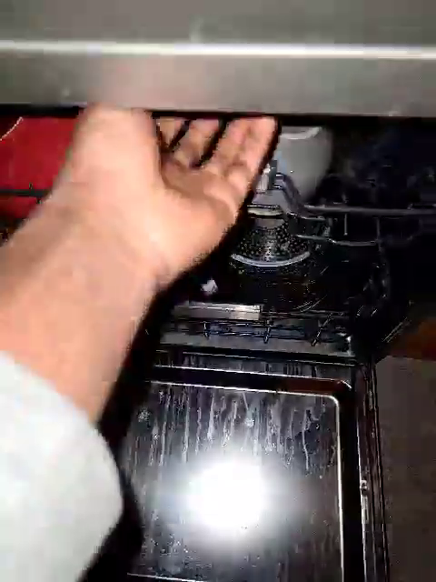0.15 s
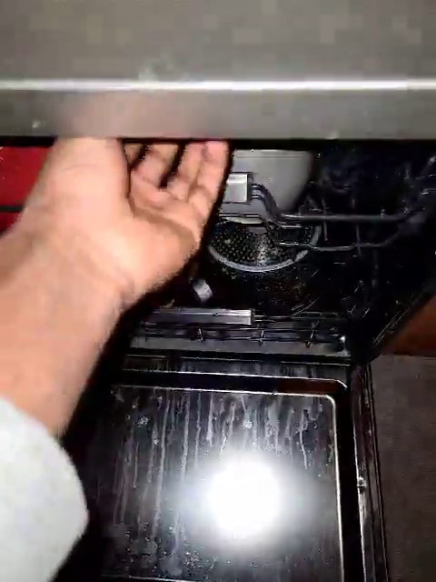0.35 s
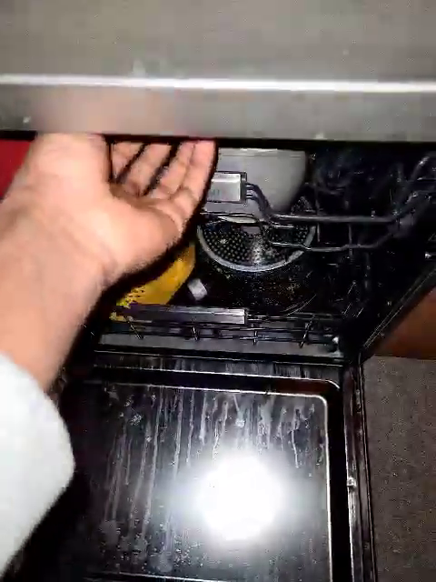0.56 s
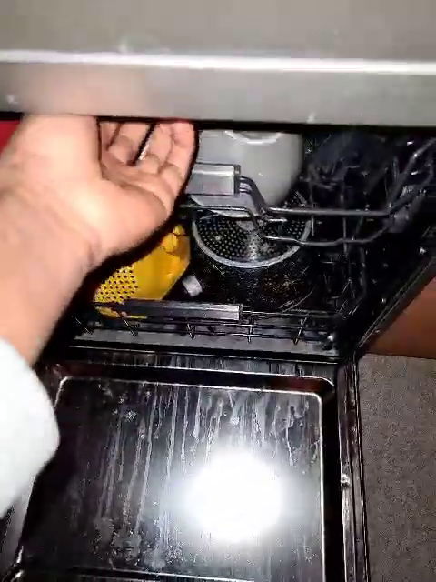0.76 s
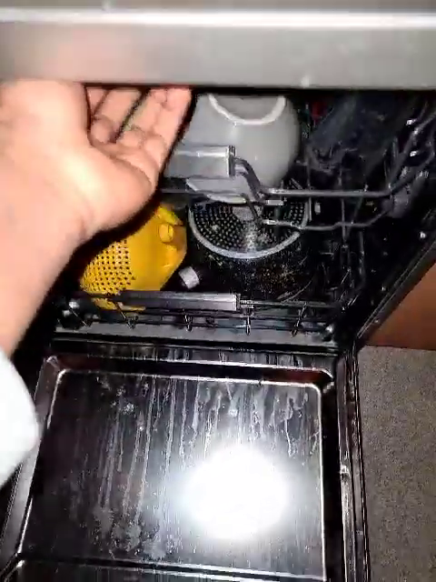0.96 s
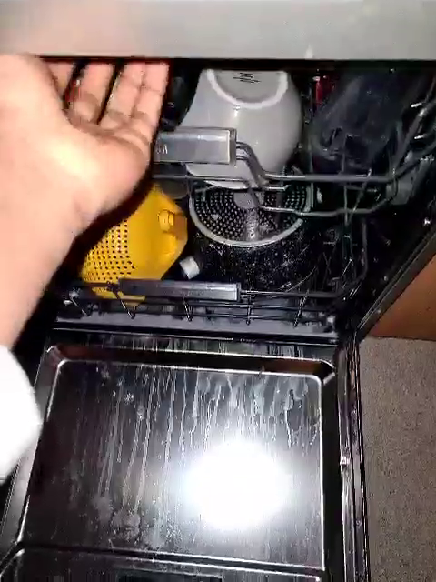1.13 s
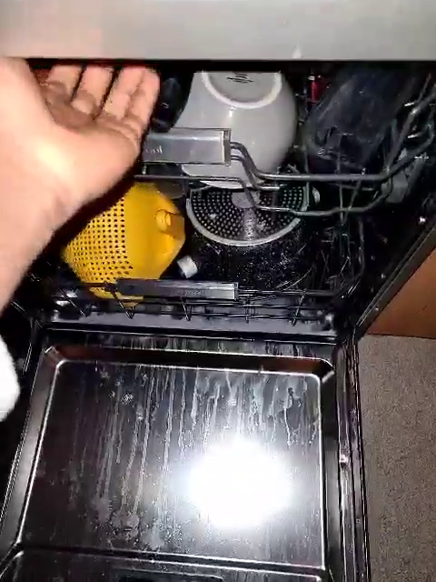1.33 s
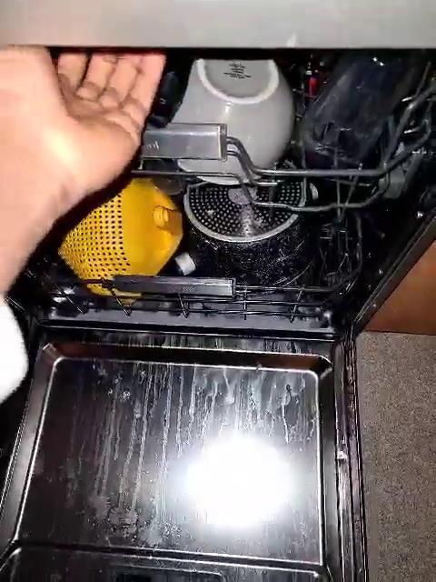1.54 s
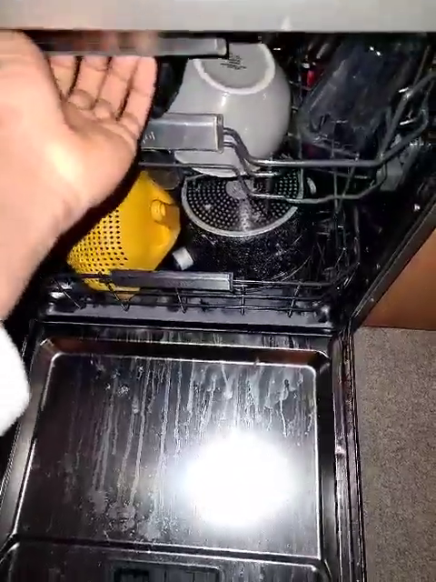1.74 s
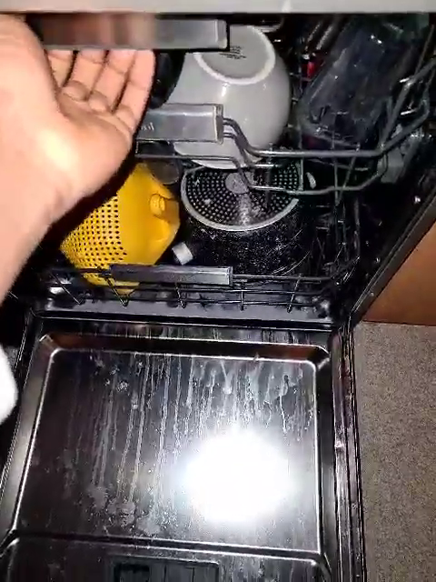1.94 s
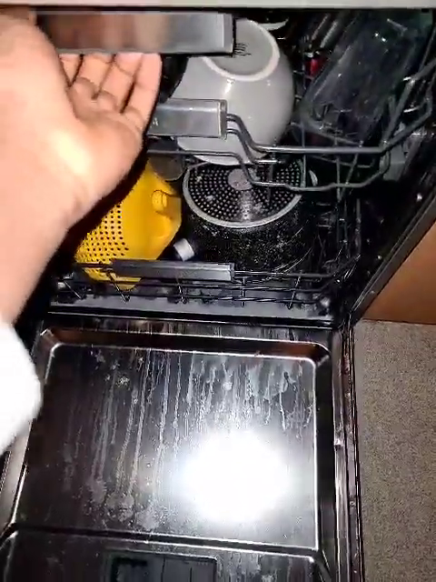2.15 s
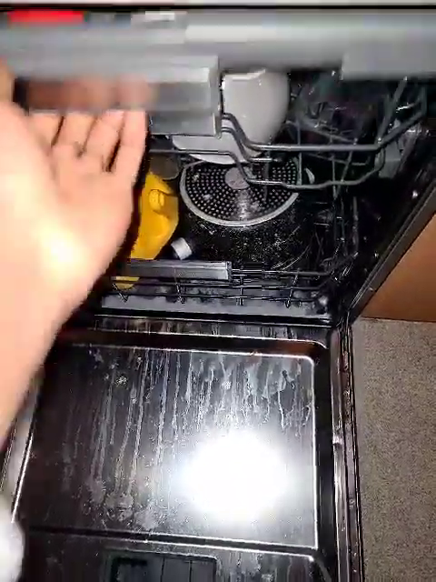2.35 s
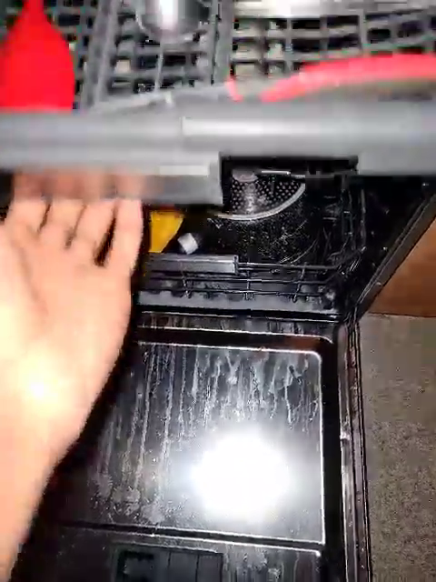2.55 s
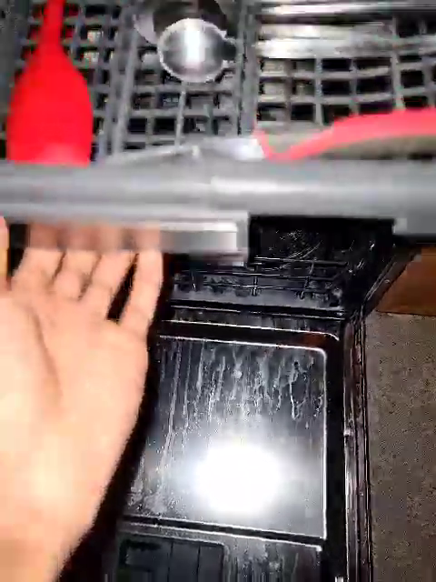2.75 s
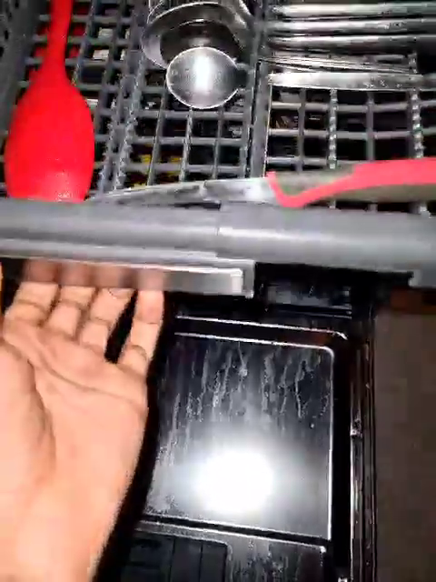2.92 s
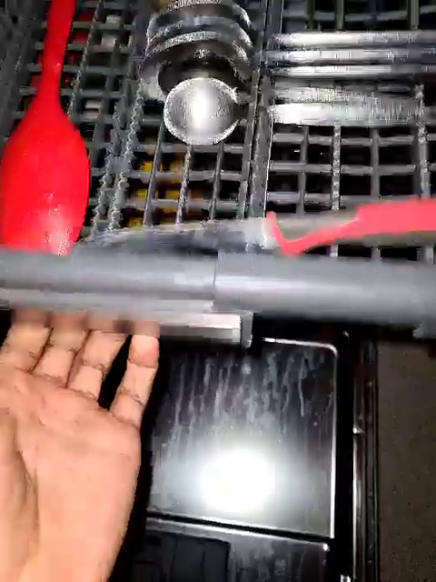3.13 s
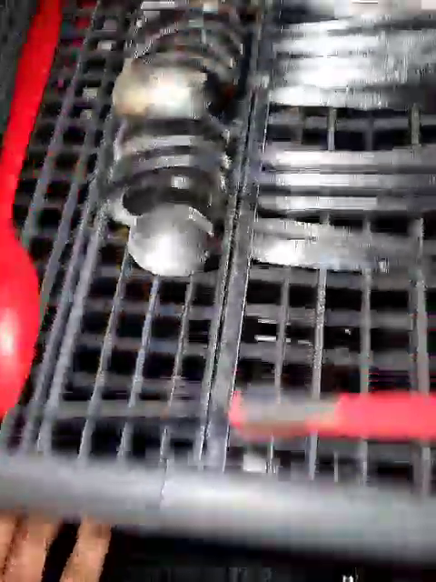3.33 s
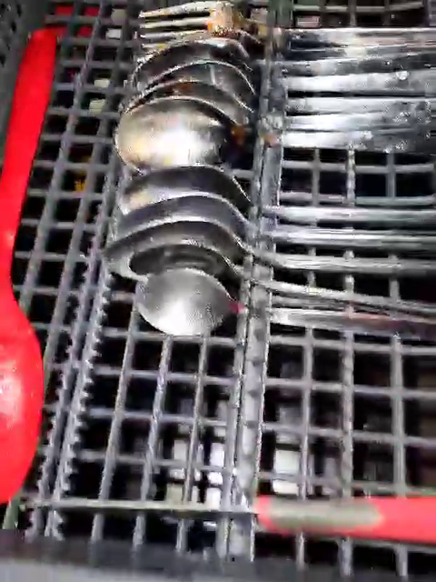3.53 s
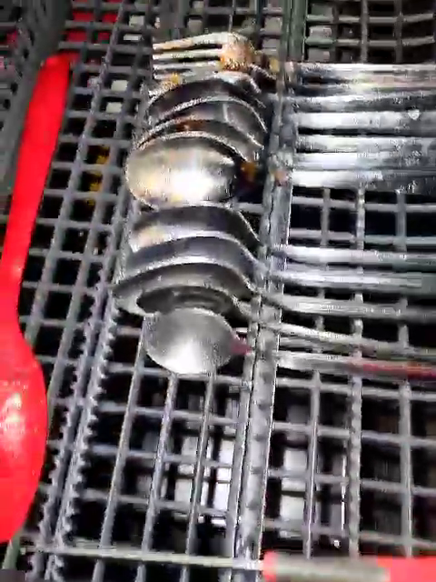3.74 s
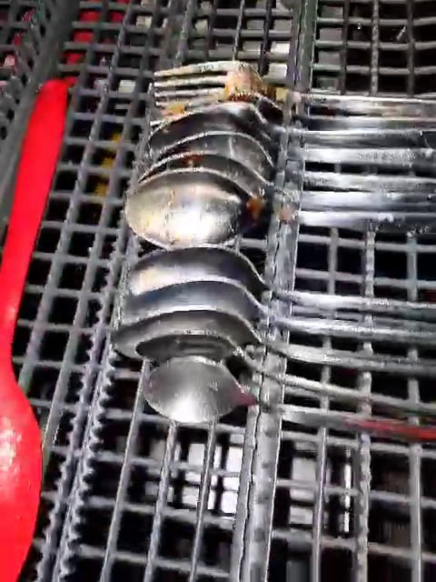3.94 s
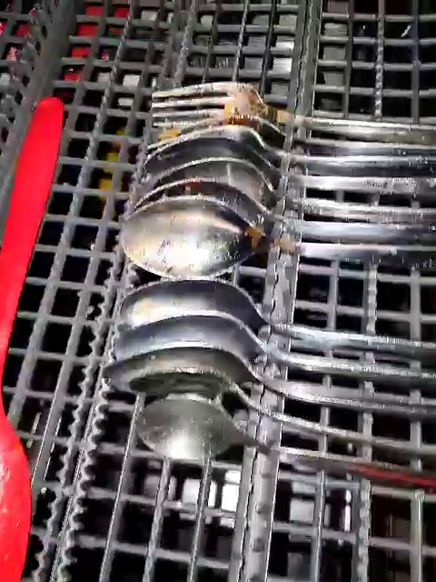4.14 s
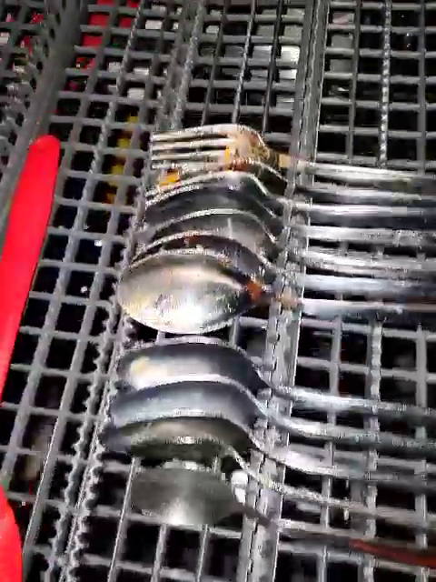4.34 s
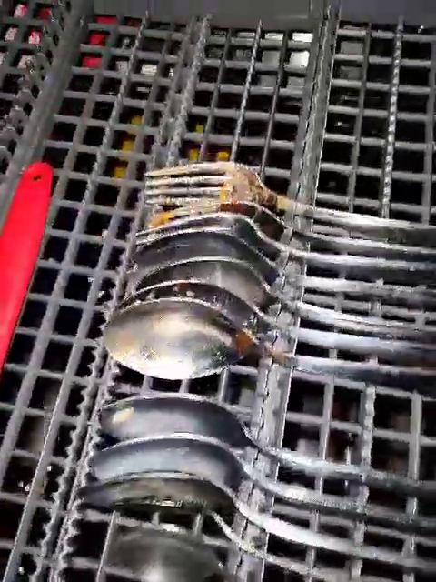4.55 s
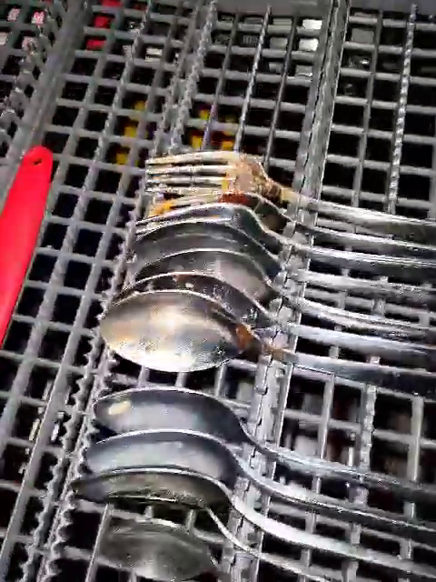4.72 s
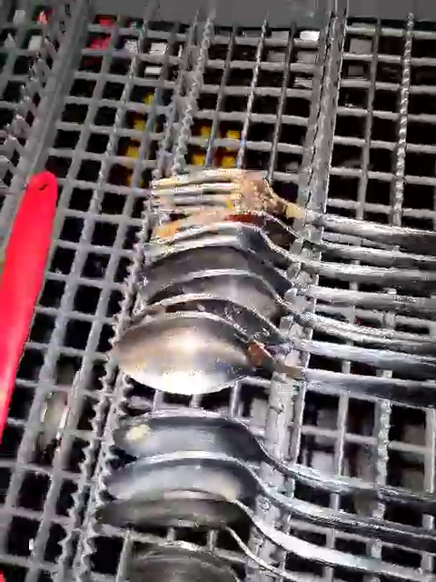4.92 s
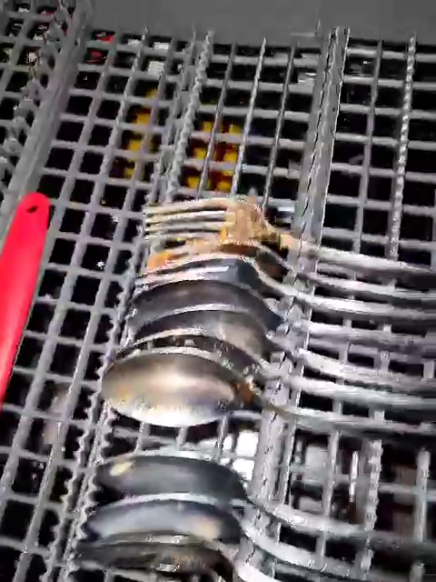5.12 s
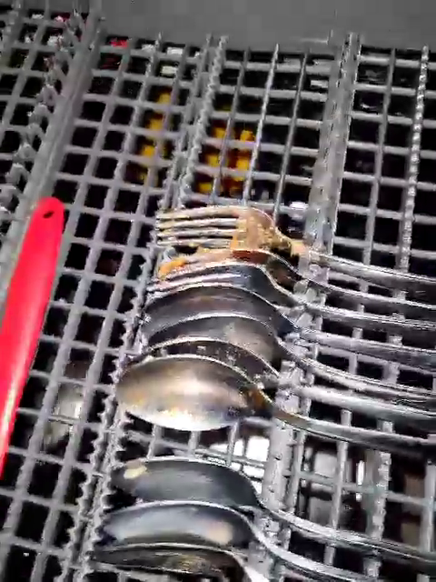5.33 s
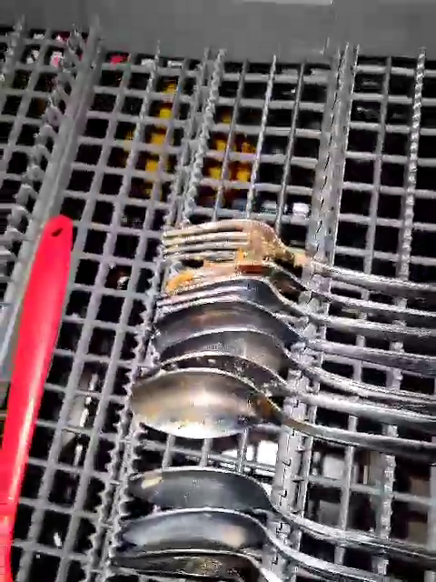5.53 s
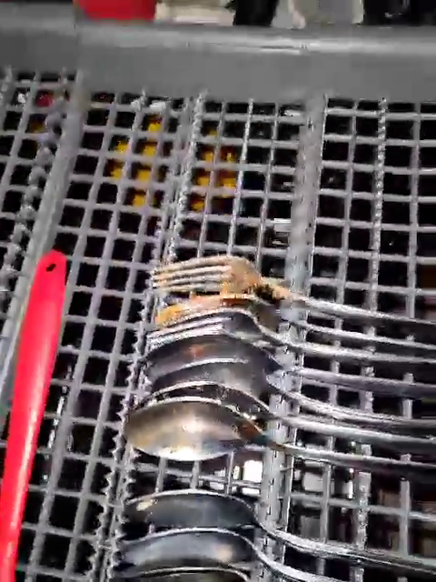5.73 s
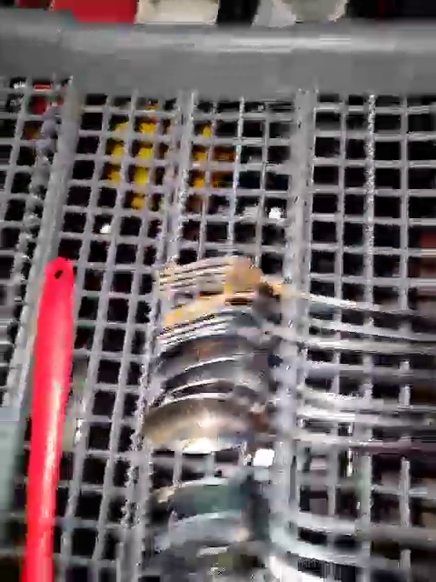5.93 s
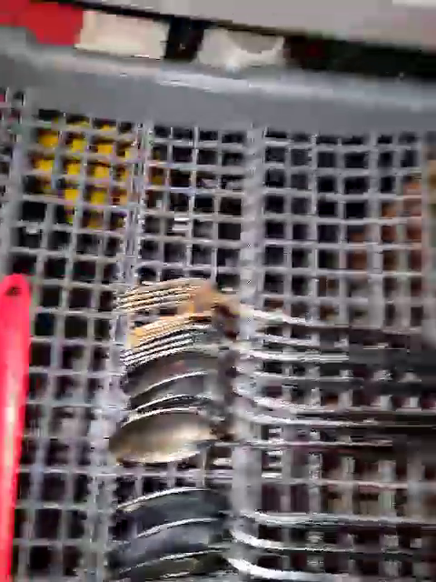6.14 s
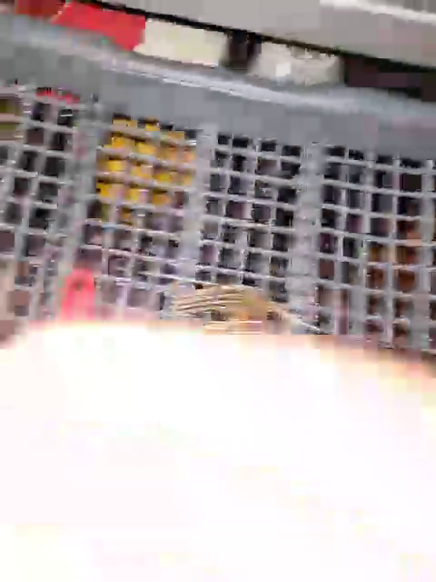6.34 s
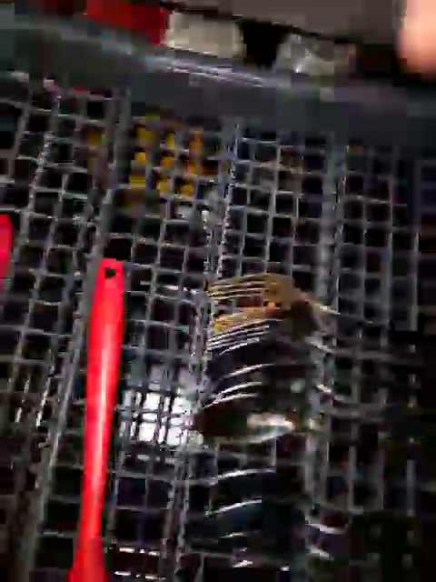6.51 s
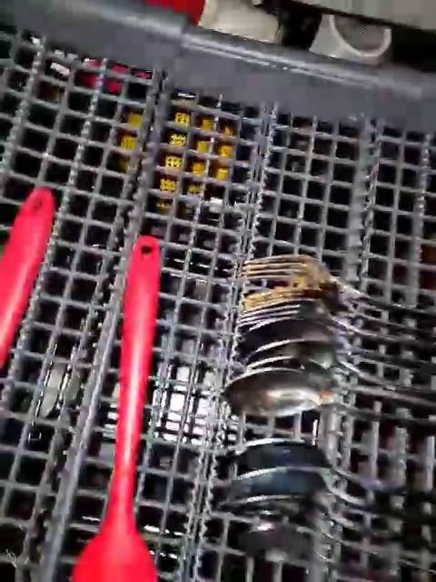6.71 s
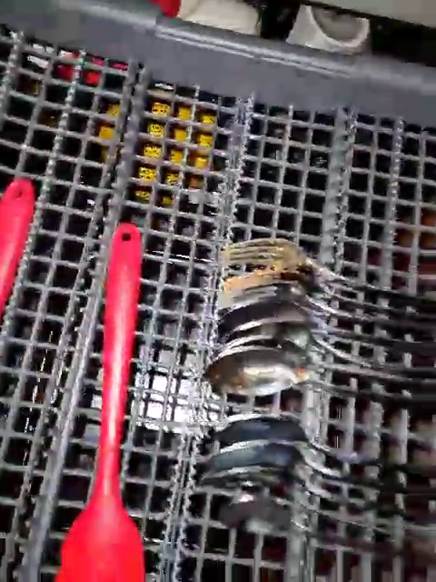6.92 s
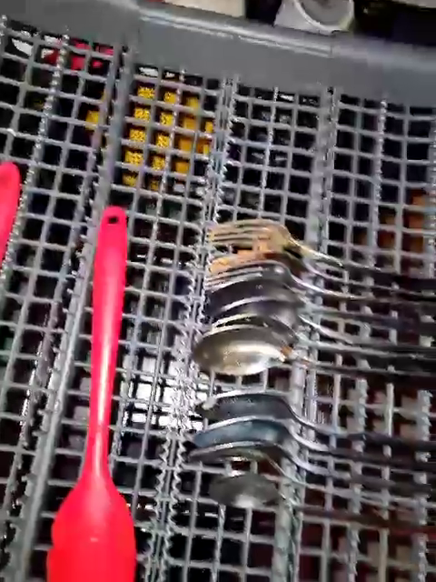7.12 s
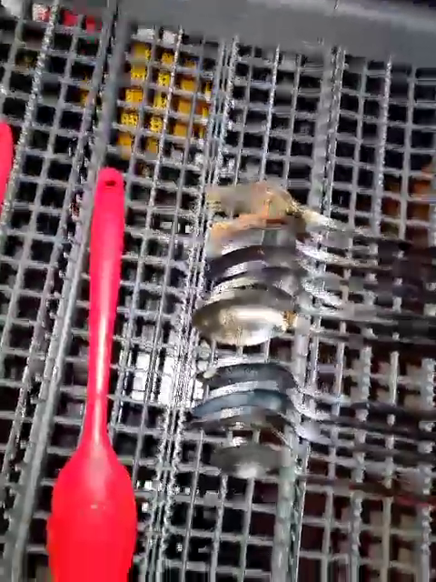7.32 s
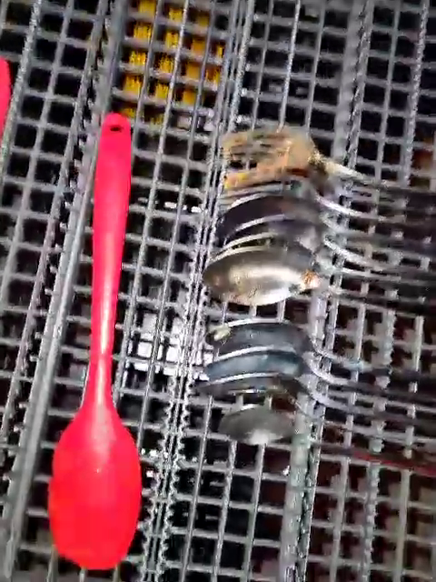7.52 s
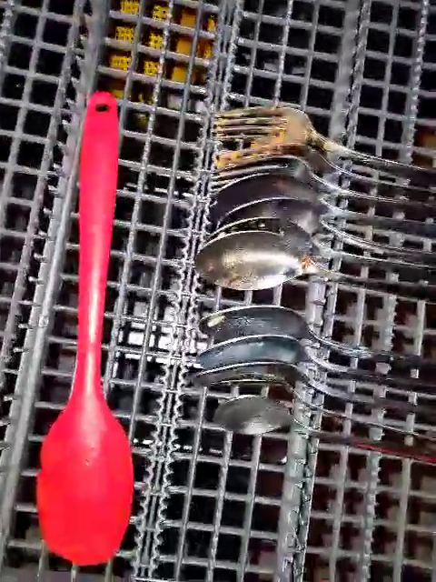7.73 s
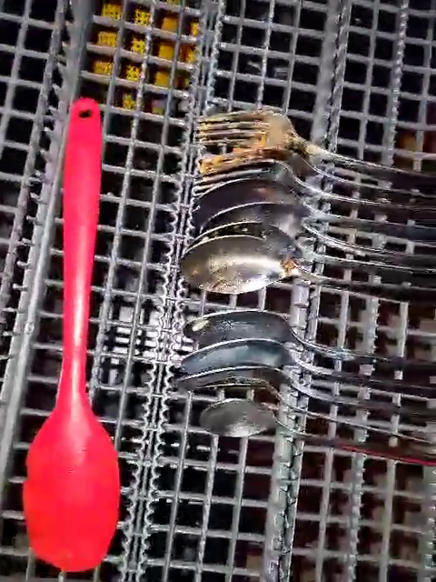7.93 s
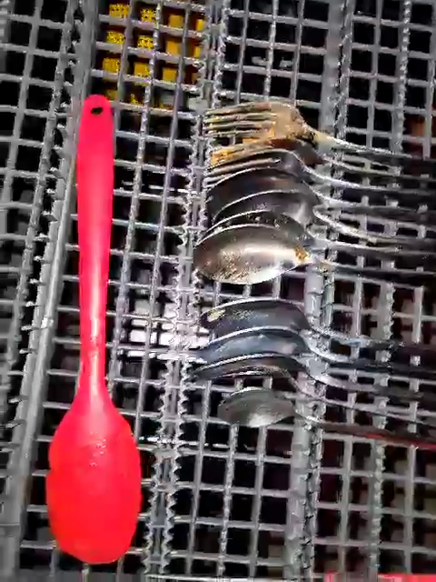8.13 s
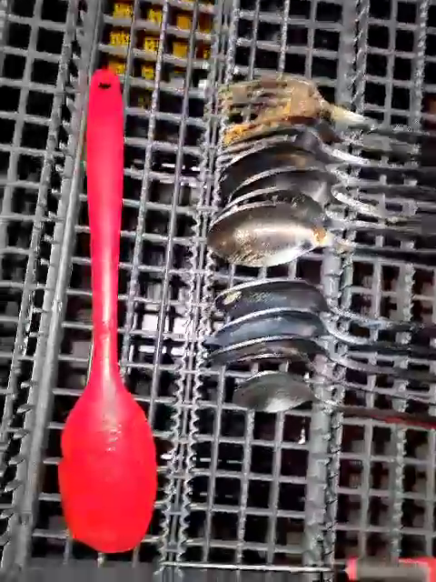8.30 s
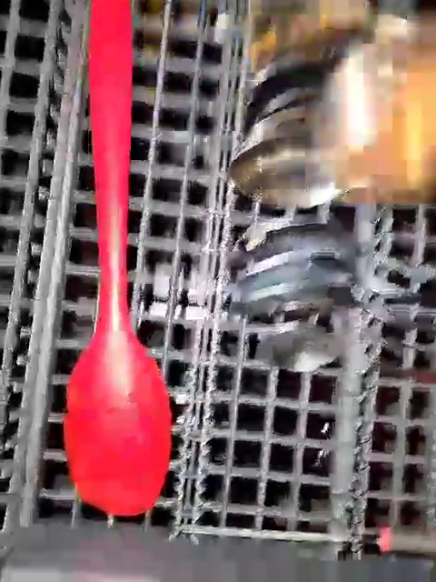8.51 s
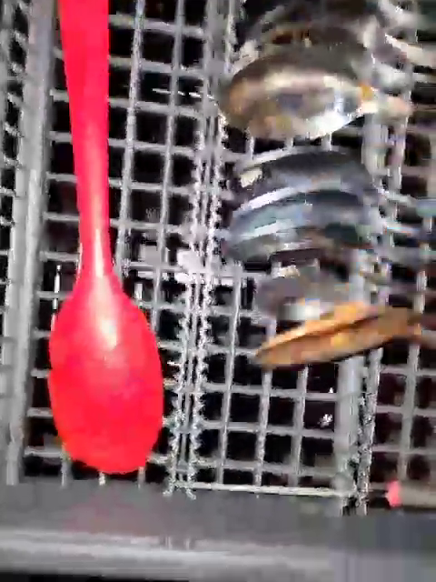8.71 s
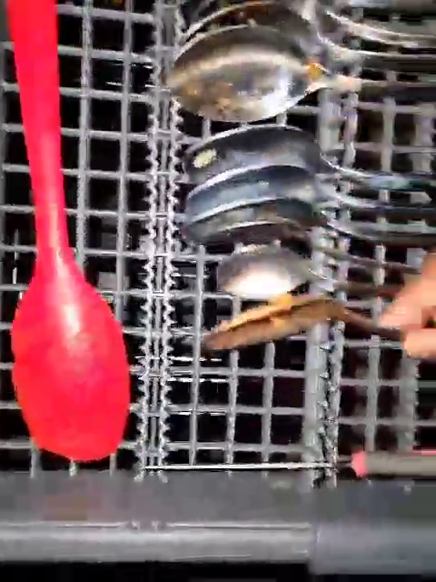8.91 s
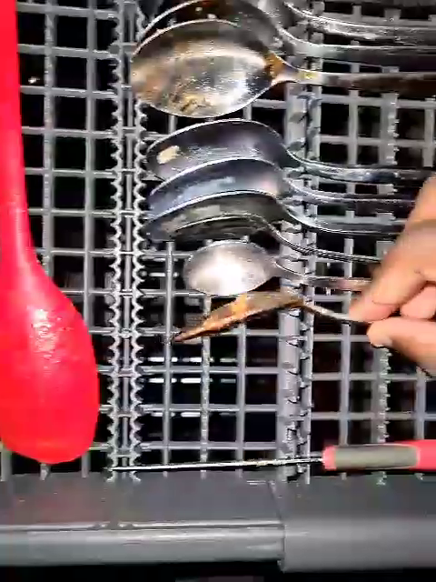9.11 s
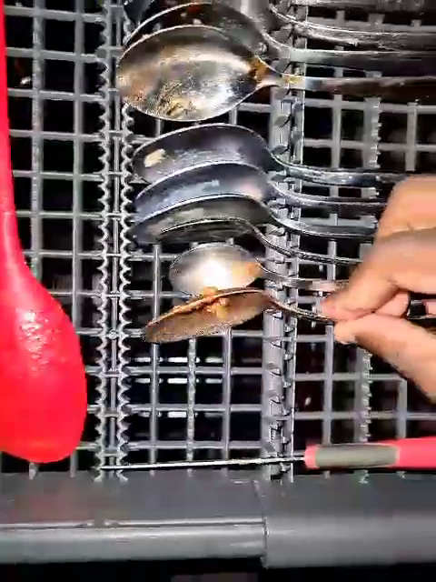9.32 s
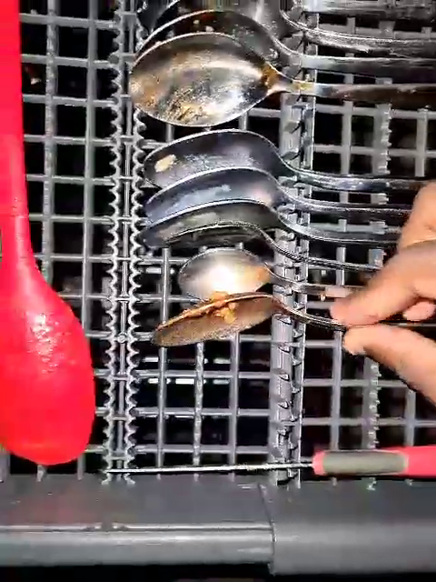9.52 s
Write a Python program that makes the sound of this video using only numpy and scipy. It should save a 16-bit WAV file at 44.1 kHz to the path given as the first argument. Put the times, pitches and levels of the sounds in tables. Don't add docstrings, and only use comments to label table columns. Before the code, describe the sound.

A quiet kitchen with faint low hum and air, heard close with a short, dull room echo. From 0 to 1.4 s a hand makes small clacks, scuffs and soft thuds on the rack, with a slight rising slip near 0.9 s. At about 1.6 s a brighter cluster of plastic and wire knocks; a faint low squeak at 1.8 s and a short higher chirp at 2.15 s. From 2.25 s the tray rolls, rumbling and rattling with jolts at 2.55 and 3.0 s, until a loud crash at 3.3 s, ringing briefly. A smaller knock at 3.5 s, then near silence with light ticks and a soft rub around 4.3-4.7 s. A sharp clattering knock lands at 5.2 s, a scrape at 5.4 s, ticks and scuffs around 6.1 s, bright cutlery clinks 6.6-7.3 s, a tiny spoon buzz at 7.8 s, sparse faint taps, and a crisp tick at 9.2 s.

```python
import sys
import numpy as np
from scipy import signal
from scipy.fft import rfft, irfft, next_fast_len
from scipy.io import wavfile

SR = 44100
rng = np.random.default_rng(int(sys.argv[2]) if len(sys.argv) > 2 else 0)


def inscribe(sig):
    pcm = np.round(np.clip(np.atleast_2d(sig).T, -1, 1) * 32767)
    wavfile.write(sys.argv[1], SR, pcm.astype(np.int16))


def voltage_ratio(level):
    return 10 ** (np.asarray(level, float) / 20)


N = 426006


def rms_one(x):
    return x / np.sqrt(np.mean(x ** 2) + 1e-20)


def in_time(rows):
    s, *columns = np.transpose(rows)
    return [np.interp(np.arange(N) / SR, s, c) for c in columns]


def every_sample(coarse):
    return np.interp(np.arange(N) / 40, np.arange(len(coarse)), coarse)


def drift(rate):
    r = np.exp(-80 * np.pi * rate / SR)
    noise = rng.standard_normal(N // 40 + 2002)
    slow = signal.lfilter([1], [1, -2 * r, r * r], noise)[2000:]
    return every_sample(rms_one(slow))


def band(x, low_hz, high_hz):
    return signal.sosfilt(signal.butter(2, [low_hz, min(high_hz, SR / 2.2)], "band", fs=SR, output="sos"), x)


def resonance(x, hz, width_hz):
    r = np.exp(-np.pi * max(width_hz, 3) / SR)
    poles = [1, -2 * r * np.cos(2 * np.pi * hz / SR), r * r]
    return signal.lfilter([(1 - r * r) / 2, 0, (r * r - 1) / 2], poles, x)


def body(x, modes, lift_db):
    top = max(db for hz, width, db in modes)
    return x + sum(voltage_ratio(db - top + lift_db) * resonance(x, hz, width) for hz, width, db in modes)


def coloured(sources, spectrum, patchy_db):
    hz, level_db = np.transpose(spectrum)
    edges = 22 * 2 ** np.arange(0, 9.6, .5)
    bands = np.zeros((19, N))
    for k, (low, high) in enumerate(zip(edges, edges[1:])):
        if hz[0] < high and low < hz[-1]:
            at = np.interp(np.log(low * high) / 2, np.log(hz), level_db)
            bands[k] = voltage_ratio(at + patchy_db * drift(11)) * band(sources[k % 2], low, high)
    return bands


def grains(size, share, spread_db):
    draw = rng.random((3,) + size)
    sizes = voltage_ratio(spread_db * np.minimum(-np.log(draw[0] + 1e-9), 5))
    return rms_one(sizes * (draw[1] < share) * np.sign(draw[2] - .5))


# frequency in Hz, level in dB per Hz.
AIR_COLOUR = [(15, -37), (25, -8), (63, 12), (129, -0.5), (177, -2), (271, -4.5), (569, -23.5), (1600, -29),
              (11000, -30.5), (12900, -26), (14000, -45.5)]
# frequency in Hz, width in Hz, level in dB.
ROOM_HUM = [(133, 13, -2), (200, 18, -5), (253, 25, -3)]


def kitchen_air():
    air = coloured(rng.standard_normal((2, N)), AIR_COLOUR, patchy_db=2.0).sum(axis=0)
    return voltage_ratio(-68) * rms_one(body(air, ROOM_HUM, lift_db=5.5))


def swells(steady_db, s, peak_db, t60, rise):
    late = np.arange(0, N, 40) / SR - s[:, None]
    events_db = peak_db[:, None] - 60 * np.maximum(late, -late / rise) / np.maximum(t60, .05)[:, None]
    return voltage_ratio(2 * np.vstack([steady_db[::40], events_db]))


# time in seconds, level in dB.
EFFORT_CURVE = [(0, -68), (1.25, -67), (1.43, -83), (1.7, -58.5), (2.04, -73), (2.28, -46.5), (2.9, -47),
                (3.09, -52), (3.3, -34.5), (3.5, -63.5), (3.85, -74), (4.22, -69.5), (4.4, -61.5),
                (4.76, -69), (5.68, -73.5), (7.1, -74.5), (7.64, -87), (9.66, -88.5)]
# peak in seconds, rattle in dB, brightness in dB, settling t60 in seconds.
LOAD_SHAKES = [(0.199, -50, -6.5, 0.64), (0.501, -55.5, -3.5, 0.87), (.85, -57, 1.5, 0.8),
               (1.06, -58, -5, 1.7), (1.6, -45, -11.5, 0.68), (1.76, -53.5, -1, 0.16),
               (2.55, -39, -16.5, 0.3), (2.88, -45.5, -11.5, 1.5), (3.311, -27.5, 5, 0.35),
               (3.531, -47.5, -2, 0.86), (4.978, -63.5, -5.5, 2.6), (5.221, -36.5, -3, 0.33),
               (5.508, -60.5, 10, 0.5), (5.738, -62, 4.5, 1.07), (6.161, -66, 3, 3.4),
               (6.635, -63.5, 12.5, 0.52), (6.873, -51.5, -7, 0.48), (7.307, -73, 17, 0.56),
               (8.32, -78.5, 32.5, 0.56), (9.24, -65, -7.5, 0.68)]
# peak in seconds, panel level in dB, thud level in dB.
RAIL_JOLTS = [(.197, -51.5, -49), (0.351, -49, -54), (.69, -51, -45), (0.759, -46, -46), (.85, -56, -68),
              (1.0, -53.5, -44), (1.27, -56.5, -52), (1.485, -56, -51), (1.59, -48, -42), (1.67, -47, -42),
              (1.75, -52, -56), (2.276, -37.5, -47), (2.33, -33.5, -51), (2.5, -38.5, -52),
              (2.549, -39.5, -40.5), (2.72, -43, -45), (2.83, -42, -40), (2.919, -47, -44),
              (2.991, -40.5, -39), (3.18, -35.5, -42), (3.3, -29.5, -32), (3.527, -33, -41),
              (4.98, -52.5, -54), (5.226, -38, -44), (5.42, -53.5, -57), (5.71, -57.5, -57),
              (6.07, -71.5, -50.5), (7.305, -69.5, -70.5), (8.32, -60.5, -62), (9.19, -54, -59.5)]
# peak in seconds, panel level in dB, thud level in dB.
LEANS = [
    (3.849, -61, -72),
    (4.049, -62.5, -71),
    (4.251, -61, -78.5),
    (4.569, -58.5, -72),
    (6.2, -64, -60.5),
    (6.63, -63.5, -69),
    (8.96, -57, -74),
]


def motion():
    jolt_t60_s, lean_t60_s, thud_longer = 0.46, 0.96, 1.3
    shake_rise, jolt_rise = 0.098, 0.03
    effort_db, = in_time(EFFORT_CURVE)
    s, peak_db, bright_db, t60 = np.transpose(LOAD_SHAKES)
    shaken = swells(effort_db, s, peak_db, t60, shake_rise)
    steady_bright = -3 - 0.23 * (effort_db[::40] + 61.5)
    bright = (shaken[0] * steady_bright + bright_db @ shaken[1:]) / shaken.sum(axis=0)
    s, panel_db, thud_db = np.transpose(RAIL_JOLTS + LEANS)
    t60 = np.repeat([jolt_t60_s, lean_t60_s], [len(RAIL_JOLTS), len(LEANS)])
    panel = swells(-59.5 + (effort_db + 56.5), s, panel_db, t60, jolt_rise)
    thud = swells(-60 + 0.86 * (effort_db + 60), s, thud_db, thud_longer * t60, jolt_rise)
    rattle_db, panel_db, thud_db = (every_sample(10 * np.log10(p.sum(axis=0))) for p in (shaken, panel, thud))
    return rattle_db, every_sample(bright), panel_db, thud_db


# frequency in Hz, level in dB per Hz.
RATTLE_COLOUR = [(210, -35.5), (350, -5.5), (769, -4), (969, -9), (1130, -4.5), (1770, -1), (3040, -13.5),
                 (4900, -19.5), (7440, -28), (14000, -25.5)]


def wires():
    contacts = grains((N,), 0.079, spread_db=3.0)
    hz, level_db = np.transpose(RATTLE_COLOUR)
    pitches = np.geomspace(520, 6500, 30) * voltage_ratio(rng.normal(0, .2, 30))
    dealt = rng.integers(0, 30, N)
    out = np.zeros(N)
    for k, pitch in enumerate(pitches):
        level = voltage_ratio(np.interp(np.log(pitch), np.log(hz), level_db))
        out += level * resonance(contacts * (dealt == k) + 1e-18, pitch, pitch / 35)
    return rms_one(out)


# frequency in Hz, width in Hz, level in dB.
RACK_MODES = [(828, 110, 13), (1173, 71, 2.5), (1483, 25, -0.5), (2000, 55, -5), (2130, 34, -11),
              (3250, 620, 3.5), (4140, 140, -14.5), (4400, 20, -2), (4660, 40, -13.5), (4830, 30, -14.5),
              (5300, 170, -18)]


def rattle(level_db, bright_db):
    bands = coloured(grains((2, N), .07, spread_db=0.0), RATTLE_COLOUR, patchy_db=3.5)
    bands /= np.std(bands[:13].sum(axis=0))
    chatter = voltage_ratio(-0.3 * bright_db) * bands[:11].sum(axis=0) + bands[11] + bands[12]
    dull = body(chatter, RACK_MODES, lift_db=-0.5) + voltage_ratio(-3.0) * wires()
    tilt_db = bright_db + 11.0
    bright = voltage_ratio(0.028 * tilt_db) * bands[13] + voltage_ratio(0.88 * tilt_db) * bands[14]
    bright += voltage_ratio(tilt_db) * bands[15:].sum(axis=0)
    return voltage_ratio(level_db - 3.5) * (dull + bright)


# frequency in Hz, level in dB per Hz.
RUMBLE_COLOUR = [(82, -38), (140, -11.5), (183, 1), (242, -14), (324, -1), (375, -14.5), (600, -13.5),
                 (780, -38), (1320, -120)]
# frequency in Hz, width in Hz, level in dB.
TUB_MODES = [(188, 30, -1), (265, 120, -5), (301, 3.4, -1)]
# frequency in Hz, level in dB per Hz.
THUD_COLOUR = [(15, -54), (25, -20.5), (67, 8.5), (113, -6), (146, -14), (170, -1.5), (220, -32),
               (370, -120)]
# frequency in Hz, width in Hz, level in dB.
CABINET_MODES = [(120, 25, 0)]


def rumble(panel_db, thud_db):
    noise = rng.standard_normal((2, N))
    panels = rms_one(body(coloured(noise, RUMBLE_COLOUR, patchy_db=1.5).sum(axis=0), TUB_MODES, lift_db=4.0))
    thuds = rms_one(body(coloured(noise, THUD_COLOUR, patchy_db=2.0).sum(axis=0), CABINET_MODES, lift_db=3.0))
    return voltage_ratio(panel_db) * panels + voltage_ratio(thud_db - 0.5) * thuds


def cutlery(x):
    pitches = np.geomspace(2300, 13000, 40) * voltage_ratio(rng.normal(0, .15, 40))
    return sum(resonance(x, p, p / 120) for p in pitches)


def knocks(rows, high_db, rise_s=0.0025):
    out, t = np.zeros(N + SR), np.arange(SR // 3) / SR
    clatters = grains((len(rows), len(t)), 0.19, spread_db=0.5)
    struck_db = rng.normal(0, 1, (len(rows), len(RACK_MODES)))
    for (s, peak_db, hz, low_db, t60), clatter, own_db in zip(rows, clatters, struck_db):
        crack = voltage_ratio(2.0) * voltage_ratio(-60 * t / 0.022)
        blow = clatter * (crack + voltage_ratio(-60 * t / max(t60, .01))) * np.minimum(t / rise_s, 1)
        mid = band(blow, 1100, 4300) + voltage_ratio(10.0) * resonance(blow * voltage_ratio(-60 * t / 0.24), hz, hz / 7)
        for (wire_hz, _, _), db in zip(RACK_MODES, own_db):
            thin_db = (wire_hz < 1000) * min(low_db + 19, 0)
            mid += voltage_ratio(-2.5 + 3.1 * db + thin_db) * resonance(blow, wire_hz, 53)
        low = voltage_ratio(low_db + 8.0) * band(blow, 350, 1500)
        high = voltage_ratio(high_db - 4.0) * band(blow * voltage_ratio(-60 * t / 1.2), 4300, 14500)
        at = round(s * SR)
        out[at:at + len(t)] += voltage_ratio(peak_db - 11.0) * (mid + low + high)
    return out[:N]


# start in seconds, peak in dB, ringing in Hz, low share in dB, clatter t60 in seconds.
STEEL_HITS = [(0.0955, -43, 1540, -23, 0.78), (0.854, -35, 1280, 1, 0.077),
              (1.0807, -35.5, 3850, -30, 0.38), (2.5485, -39, 2480, -1, 0.1),
              (4.6915, -38.5, 5200, -29, 0.022), (5.2444, -27.5, 1370, -10, 0.095),
              (5.5052, -67, 3560, -25, 0.14), (6.629, -43, 1420, -41, 1), (6.961, -40, 3400, -18, 0.27),
              (7.0255, -41, 3000, -34, 0.4), (7.3005, -40.5, 1470, -21.5, 0.43),
              (8.6205, -51.5, 1500, -35, 0.45)]


def steel_knocks():
    return knocks(STEEL_HITS, high_db=-1.5)


def kitchen(x):
    t60_s, wall_cut_hz = 0.33, 2000
    size = next_fast_len(N + SR)
    w = 2 * np.pi * np.arange(size // 2 + 1) / size
    dull = 1 / (1 + 1j * w * SR / (2 * np.pi * wall_cut_hz))
    echoes = 0
    for k, lag in enumerate((rng.uniform(.008, .03, 8) * SR).astype(int)):
        loop = voltage_ratio(-60 * lag / SR / t60_s) * dull * np.exp(-1j * w * lag)
        echoes = echoes + (-1) ** k * loop / (1 - loop)
    return irfft(rfft(x, size) * echoes, size)[:N]


# start in seconds, peak in dB, ringing in Hz, low share in dB, clatter t60 in seconds.
PLASTIC_SCUFFS = [(0.1525, -32.5, 1230, 8.5, 0.074), (1.52, -36.5, 1094, -0.5, 0.75),
                  (1.572, -21, 3240, -18, 0.058), (1.6486, -20.5, 3870, -22, 0.09),
                  (2.2721, -17.5, 3630, -5, 0.28), (3.2001, -29, 1950, 14.5, 0.97),
                  (3.2498, -14, 3350, -3, 0.34), (5.414, -25.5, 1830, 4.5, 0.081),
                  (6.2941, -32, 1395, -38, 0.18), (7.925, -40, 984, -9, 0.28),
                  (9.1657, -41, 1880, -27.5, 0.31)]
# start in seconds, peak in dB, ringing in Hz, low share in dB, clatter t60 in seconds.
METAL_SCUFFS = [
    (5.3765, -35.5, 2620, -24, 0.48),
    (6.1528, -32.5, 1410, -34, 0.44),
]


def scuffs():
    plastic = knocks(PLASTIC_SCUFFS, high_db=-20.5, rise_s=0.025)
    return plastic + knocks(METAL_SCUFFS, high_db=-1.5, rise_s=0.025)


# start in seconds, peak in dB, ringing in Hz, low share in dB, clatter t60 in seconds.
PLASTIC_HITS = [(0.1975, -34, 2560, -27, 0.044), (0.4246, -40.5, 2900, -7, 0.45),
                (0.6953, -57, 1080, 17.5, 0.47), (1.5946, -41, 5000, 11.5, 0.15),
                (1.6708, -35.5, 3640, -3, 0.52), (2.047, -44.5, 1340, -9, 0.31),
                (2.8186, -34.5, 5300, -19, 0.2), (2.992, -22.5, 2400, 5, 0.23),
                (3.1188, -50, 1580, 21.5, 0.4), (3.5257, -30, 3700, 6, 0.28), (4.9741, -45, 3500, -6, 0.32),
                (5.2178, -24, 3340, 0, 0.057), (5.7103, -55, 1410, -8, 0.25),
                (6.3088, -39, 1010, -6.5, 0.15), (6.555, -45.5, 1880, -30, 0.35),
                (7.0778, -43.5, 2660, -20, 0.21), (7.9517, -42, 1590, -7, 0.51),
                (9.0269, -48, 1960, -5, 0.35), (9.2209, -45.5, 2840, -10, 0.08)]


def plastic_knocks():
    return knocks(PLASTIC_HITS, high_db=-22.5)


def free_rings(rows, rise_cycles, flutter):
    out, t = np.zeros(N + SR), np.arange(SR // 2) / SR
    for (s, peak_db, hz, t60), draw in zip(rows, rng.standard_normal((len(rows), 2, 200))):
        step = t * max(hz, 1500) / 22
        depth = flutter * np.minimum(step / 2, 1)
        along, across = (depth * np.interp(step, np.arange(200), d) for d in draw)
        phase = 2 * np.pi * hz * t
        ring = ((1 + along) * np.sin(phase) + across * np.cos(phase)) / np.sqrt(1 + flutter ** 2)
        at = round(s * SR)
        out[at:at + len(t)] += voltage_ratio(peak_db - 60 * t / max(t60, .01)) * (1 - np.exp(-t * hz / rise_cycles)) * ring
    return out[:N]


# start in seconds, peak in dB, pitch in Hz, t60 in seconds.
DISH_PINGS = [(.198, -50, 2790, 0.064), (.198, -46, 3560, 0.06), (.305, -48.5, 1860, .1),
              (.335, -43, 673, 0.063), (1.594, -38, 3340, 0.045), (1.085, -40.5, 833, 0.056),
              (1.596, -31.5, 2666, .09), (1.596, -40, 553, 0.13), (1.597, -46, 5160, 0.14),
              (1.634, -40, 2640, 0.054), (1.6645, -40, 4070, 0.12), (1.575, -42, 3250, 0.04),
              (1.6645, -43, 5670, 0.066), (1.6645, -49, 4860, 0.16), (2.549, -33, 479, 0.08),
              (2.866, -35.5, 1280, 0.16), (2.992, -17.5, 687, 0.046), (2.992, -33, 1280, .11),
              (2.992, -28, 1830, 0.066), (2.992, -37, 4050, 0.19), (2.992, -25, 5000, 0.029),
              (3.322, -16, 860, 0.066), (3.315, -31, 1740, 0.14), (3.315, -25.5, 1606, 0.12),
              (3.315, -20, 2020, 0.1), (3.315, -25, 3280, 0.13), (3.315, -31, 4280, 0.31),
              (3.315, -30.5, 4950, .16), (9.0272, -46, 2600, 0.012), (3.616, -33, 1500, 0.048),
              (5.005, -51.5, 877, 0.14), (5.015, -46, 1770, 0.047), (5.22, -32.5, 877, 0.08),
              (5.22, -34.5, 582, 0.12), (5.22, -30, 1980, 0.066), (5.245, -40, 1960, .06),
              (5.22, -42, 3250, 0.19), (5.245, -47, 5700, 0.053), (5.415, -45.5, 854, 0.14),
              (6.632, -45, 4900, 0.039), (6.87, -44.5, 3330, 0.095), (7.08, -58, 880, 0.04),
              (7.302, -53, 4770, 0.065), (7.305, -55, 2055, 0.11), (7.315, -55, 1485, 0.18),
              (8.316, -48, 5090, 0.09), (8.625, -61, 1520, 0.22), (9.188, -36.5, 1443, .02)]


def pings():
    return free_rings(DISH_PINGS, rise_cycles=1.2, flutter=1.3)


# start in seconds, peak in dB, ringing in Hz, low share in dB, clatter t60 in seconds.
WIRE_HITS = [(0.3915, -42.5, 2860, -1, 0.067), (0.7582, -37.5, 1530, -0.5, 0.43),
             (0.9925, -35, 940, -32, 0.13), (1.045, -44.5, 3280, 3, 0.46), (1.1655, -39.5, 1110, -9, 0.28),
             (1.3094, -47.5, 1930, 9, 0.15), (1.928, -47.5, 3460, -4, 0.49), (2.252, -26.5, 1830, -3, 0.14),
             (2.7242, -41, 4030, -26, 0.22), (2.7473, -31.5, 1120, -3, 0.46),
             (3.2981, -14, 4000, -3.5, 0.26), (3.3165, -5.5, 2000, -21, 0.11),
             (4.8498, -46, 1430, -23.5, 0.54), (6.8649, -36, 1730, -32, 0.28),
             (6.8748, -36.5, 3040, -32, 0.41), (8.1848, -55.5, 4260, -27, 1),
             (8.225, -52.5, 1690, -13, 0.72), (8.3138, -44, 1710, -4.5, 0.55),
             (8.957, -48.5, 1720, -12.5, 0.21)]


def wire_knocks():
    return knocks(WIRE_HITS, high_db=-13)


def squeak(rows, second_db, rough):
    hz, level_db = in_time(rows)
    t = np.arange(N) / SR
    phase = 2 * np.pi * np.cumsum(hz * (1 + 0.0292 * rough * drift(26.3))) / SR
    fade = np.clip(np.minimum(t - rows[0][0], rows[-1][0] - t) / 0.0187, 0, 1)
    level = fade * voltage_ratio(level_db + 7.0 + 7.8 * rough * drift(40))
    return level * (np.sin(phase) + voltage_ratio(second_db) * np.sin(2 * phase))


# time in seconds, pitch in Hz, level in dB.
SLIP_GLIDES = [
    [(0.85, 1250, -52), (0.865, 1300, -48), (0.91, 1400, -44), (0.97, 1750, -66)],
    [(2.855, 1326, -44), (2.89, 1305, -42), (2.94, 1340, -41)],
]


def rail_slips():
    slips = sum(squeak(slip, second_db=-30, rough=.3) for slip in SLIP_GLIDES)
    return slips * voltage_ratio(-7.5) * drift(250)


# start in seconds, peak in dB, pitch in Hz, t60 in seconds.
CABINET_BOOMS = [(1.484, -46, 238, 0.05), (1.668, -35.5, 215, 0.13), (2.31, -28, 198, 0.079),
                 (2.345, -28, 201, 0.089), (2.55, -26, 128, 0.28), (2.55, -27.5, 194, 0.16),
                 (2.55, -53, 326, 0.24), (2.722, -32, 123, .2), (2.76, -26.5, 120, 0.21),
                 (2.925, -25.5, 102.4, 0.23), (3.19, -31, 188, 0.17), (3.285, -19.5, 183, 0.24),
                 (3.32, -27, 127, 0.16), (3.32, -27.5, 322, 0.21), (3.527, -34.5, 194, 0.094),
                 (3.545, -38, 322, 0.16), (5.22, -34, 297.4, 0.22), (6.072, -37, 111.7, 0.06),
                 (6.17, -42, 84, 0.13), (6.23, -44, 78, .15), (6.3, -48, 90, 0.11),
                 (7.318, -56.5, 241.5, 0.11), (8.315, -49.5, 232, 0.12), (8.958, -51, 300, .08),
                 (9.028, -48, 299.4, 0.095), (9.19, -50.5, 296, .2), (4.0, -55, 195.7, 1.5),
                 (4.2, -59, 187, 1), (5.245, -34, 265, 0.19), (6.075, -45, 45.6, 0.6),
                 (3.3, -23, 183.3, 0.18), (.87, -42.5, 253, 0.12)]


def booms():
    return free_rings(CABINET_BOOMS, rise_cycles=0.49, flutter=.4)


# start in seconds, level in dB, pitch in Hz, t60 in seconds.
CHATTER_NOTES = [
    (1.596, -45, 2510, 0.07),
    (1.595, -44, 574, 0.57),
    (1.665, -55, 4130, 0.25),
    (3.33, -34.5, 4230, 0.25),
    (4.82, -63, 1340, 0.4),
    (5.225, -36, 820, 0.11),
    (6.88, -41.5, 1504, 0.15),
    (8.359, -61, 2930, 0.3),
    (3.41, -44, 3240, 0.25),
]


def rings():
    out, t = np.zeros(N + SR), np.arange(SR // 2) / SR
    chatters = grains((len(CHATTER_NOTES), len(t)), .02, spread_db=3.0)
    for (s, level_db, hz, t60), chatter in zip(CHATTER_NOTES, chatters):
        note = rms_one(resonance(resonance(chatter, hz, hz / 9), hz, hz / 6))
        at = round(s * SR)
        out[at:at + len(t)] += voltage_ratio(level_db - 60 * t / t60) * np.minimum(t / 0.0046, 1) * note
    return out[:N]


# time in seconds, pitch in Hz, level in dB.
LOW_SQUEAK = [
    (1.78, 454.4, -78),
    (1.802, 417, -56.5),
    (1.914, 412, -67),
    (1.95, 406, -62),
]
# time in seconds, pitch in Hz, level in dB.
HIGH_SQUEAK = [
    (2.125, 705, -86),
    (2.139, 695, -46),
    (2.155, 714, -40),
    (2.185, 687, -65),
]


def roller_squeaks():
    return squeak(LOW_SQUEAK, second_db=-28, rough=.4) + squeak(HIGH_SQUEAK, second_db=-18, rough=.15)


# start in seconds, peak in dB, ringing in Hz, low share in dB, clatter t60 in seconds.
STRAY_HITS = [(2.5, -36, 1500, -3, 0.33), (2.6698, -46, 1800, -18, 0.12), (3.2275, -24, 2097, -11, 0.31),
              (4.995, -50.5, 3400, 9.5, 0.25), (5.105, -51.5, 3600, -25, 0.93),
              (5.171, -45.5, 1550, 3, 0.4), (5.624, -53.5, 1730, -18.5, .15), (5.71, -60, 3000, -22, 0.23),
              (5.93, -58, 4500, -24, 0.3), (5.955, -44, 1550, -25, 0.9), (6.695, -40.5, 1294, -16.5, 0.33),
              (6.808, -49, 4570, -24, 0.51), (9.074, -54.5, 1816, -4, 0.23), (6.629, -40, 6500, -26, 0.43),
              (7.0255, -44, 6530, -32.5, 0.19), (7.3005, -45, 4900, -30.5, 0.42),
              (8.3138, -41, 4720, -30, 0.42), (8.6205, -50, 4940, -30.5, 0.52),
              (3.119, -37.5, 1500, 2, 0.091), (5.71, -52, 7050, -30, 0.54)]


def stray_knocks():
    return knocks(STRAY_HITS, high_db=-13)


# start in seconds, peak in dB, pitch in Hz, t60 in seconds.
PLASTIC_NOTES = [(2.549, -35, 730, 0.06), (2.995, -33.5, 398, 0.19), (3.3, -29, 565, 0.13),
                 (3.315, -16.5, 1157, 0.07), (3.527, -36, 635, 0.077), (4.64, -57, 1490, 0.15),
                 (4.8, -60, 1200, 0.1), (6.31, -45, 1036, 0.094), (7.493, -69, 945, 0.1),
                 (8.183, -70, 2250, 0.5), (8.235, -66, 1660, .25), (8.961, -56.5, 480, 0.1)]


def tray_notes():
    return free_rings(PLASTIC_NOTES, rise_cycles=1.2, flutter=1.3)


# start in seconds, peak in dB, pitch in Hz, t60 in seconds.
DRY_TICKS = [
    (3.615, -31.5, 1810, 0.03),
    (4.6927, -48.5, 5460, 0.016),
    (6.0678, -36, 2100, 0.0045),
    (6.0763, -31, 1710, 0.0066),
    (9.188, -27, 1890, 0.017),
    (9.374, -56, 2000, 0.013),
    (9.4668, -59.5, 1780, 0.015),
]


def ticks():
    out, t = np.zeros(N + SR), np.arange(SR // 5) / SR
    for s, peak_db, hz, t60 in DRY_TICKS:
        ring = voltage_ratio(-60 * t / max(t60, .005)) * np.minimum(t / 0.00017, 1) * np.sin(2 * np.pi * hz * t)
        click = voltage_ratio(-23.0) * voltage_ratio(-60 * t / 0.0021) * rng.standard_normal(len(t))
        at = round(s * SR)
        out[at:at + len(t)] += voltage_ratio(peak_db) * (ring + click)
    return out[:N]


def rub():
    start_s, end_s, level_db, hz = 4.26, 4.72, -67, 4200
    swell = np.sin(np.pi * np.clip((np.arange(N) / SR - start_s) / (end_s - start_s), 0, 1))
    return voltage_ratio(level_db) * swell * rms_one(band(rng.standard_normal(N), hz / 1.8, hz * 0.91))


# frequency in Hz, width in Hz, level in dB.
SPOON_MODES = [(665, 124, 0), (1280, 18, 0), (1830, 62, -1), (2660, 20, -10), (3180, 46, -4),
               (4050, 35, -4), (4500, 58, -5.5), (4940, 35, -7), (5370, 22, -14), (6000, 36, -17),
               (7140, 40, -19.5), (8300, 38, -11.5)]
# time in seconds, level in dB.
SPOON_BUZZ = [
    (7.75, -67),
    (7.768, -60),
    (7.852, -74),
    (7.92, -90),
]


def spoon():
    t = np.arange(N) / SR
    chatter = grains((N,), 0.085, spread_db=-1.5)
    modes = rms_one(sum(voltage_ratio(db) * resonance(chatter, hz, 1.1 * width) for hz, width, db in SPOON_MODES))
    touching = (t > SPOON_BUZZ[0][0]) * (t < SPOON_BUZZ[-1][0])
    return touching * voltage_ratio(in_time(SPOON_BUZZ)[0]) * modes


def scene():
    rattle_db, bright_db, panel_db, thud_db = motion()
    moving = rattle(rattle_db, bright_db) + rumble(panel_db, thud_db)
    moving += rail_slips() + booms() + roller_squeaks() + rub()
    struck = steel_knocks() + scuffs() + plastic_knocks() + wire_knocks() + stray_knocks()
    struck += pings() + rings() + tray_notes() + spoon()
    dry_ticks = ticks()
    room = voltage_ratio(-11.5) * kitchen(struck + voltage_ratio(-4.0) * dry_ticks)
    struck += voltage_ratio(-0.5) * cutlery(struck + voltage_ratio(-4.0) * moving)
    return (struck + dry_ticks + room + moving + kitchen_air())[None]


def roll_off(x):
    return signal.sosfilt(signal.butter(12, 14570, fs=SR, output="sos"), x)


def record(dry):
    thin = signal.sosfilt(signal.butter(2, 42.2, "high", fs=SR, output="sos"), dry)
    mix = signal.sosfilt(signal.cheby2(12, 70, 15050, fs=SR, output="sos"), thin)
    return roll_off(mix)


dry = scene()
out = record(dry)
inscribe(out)
```